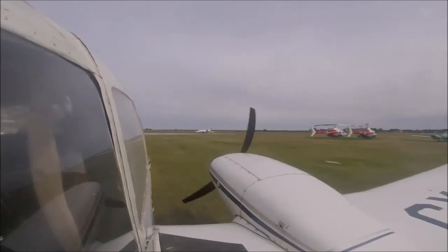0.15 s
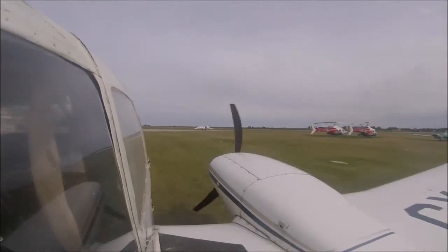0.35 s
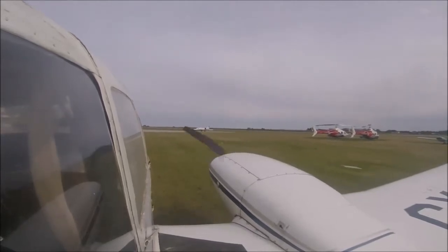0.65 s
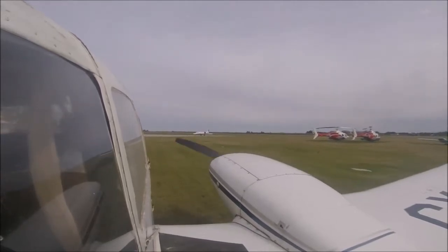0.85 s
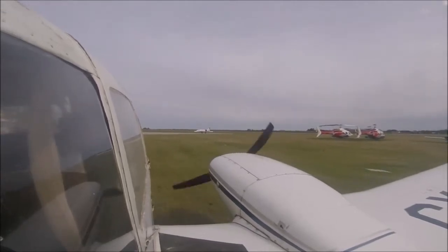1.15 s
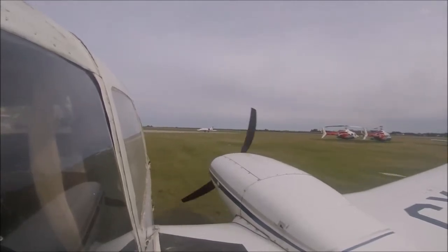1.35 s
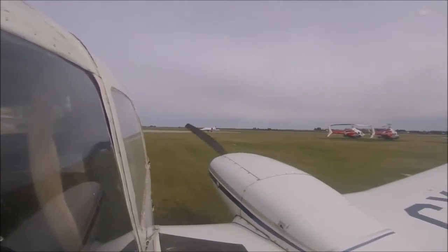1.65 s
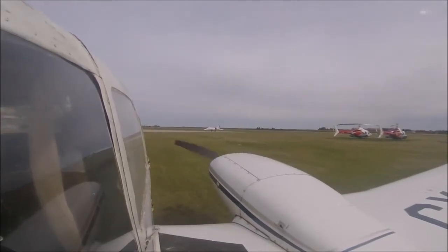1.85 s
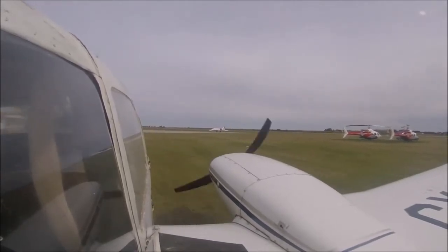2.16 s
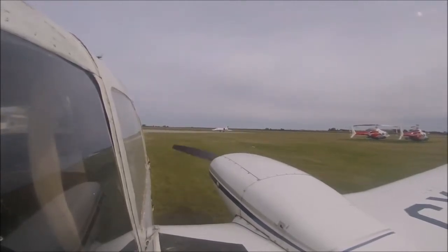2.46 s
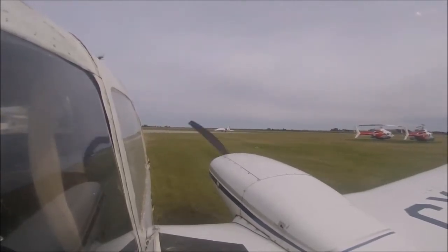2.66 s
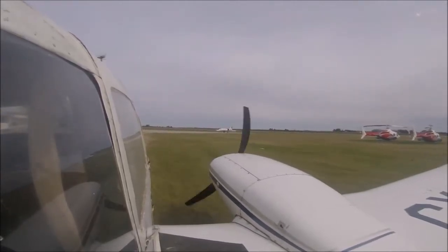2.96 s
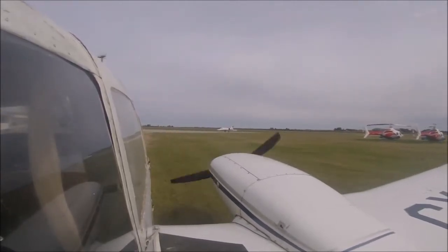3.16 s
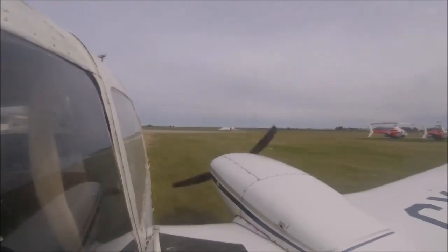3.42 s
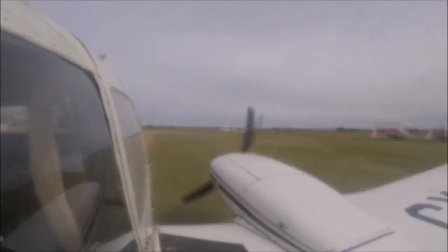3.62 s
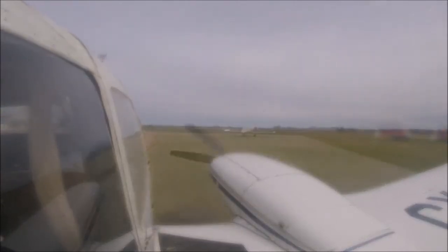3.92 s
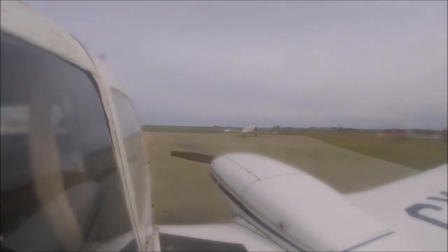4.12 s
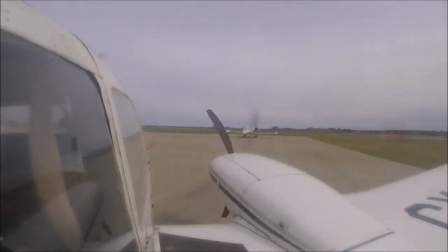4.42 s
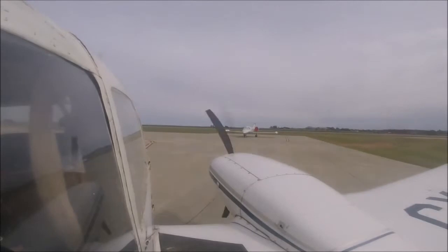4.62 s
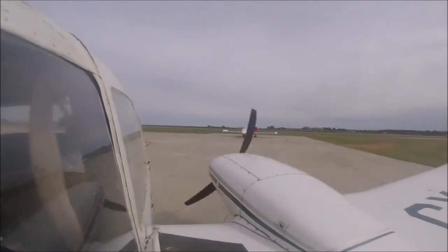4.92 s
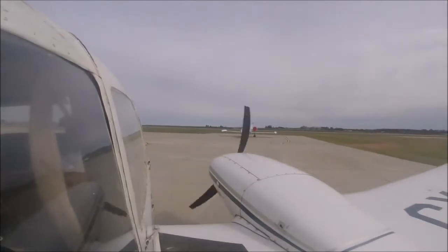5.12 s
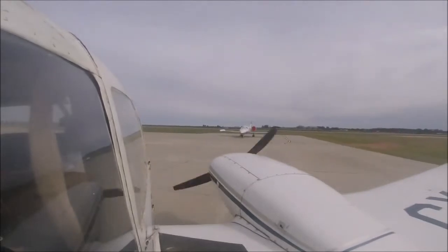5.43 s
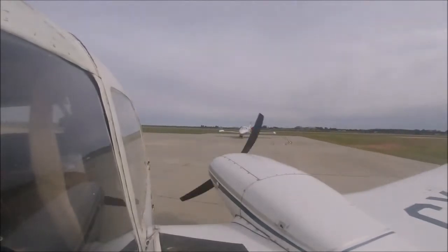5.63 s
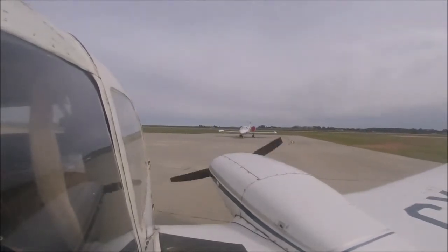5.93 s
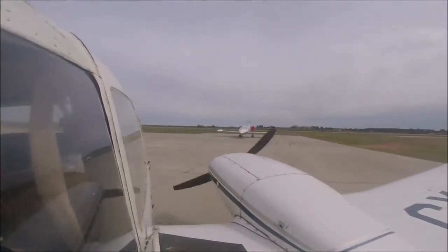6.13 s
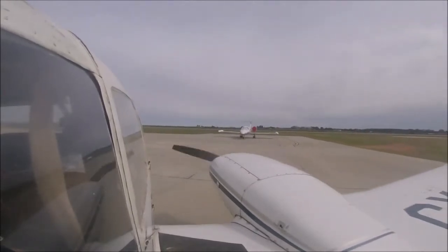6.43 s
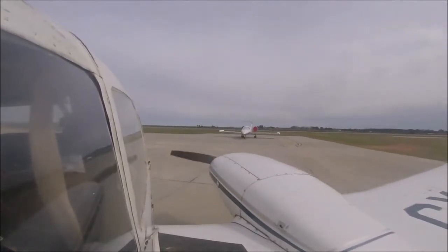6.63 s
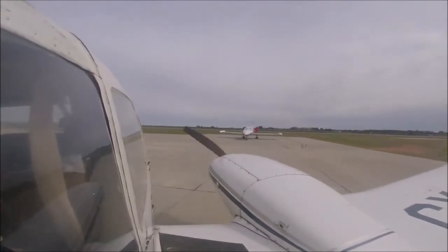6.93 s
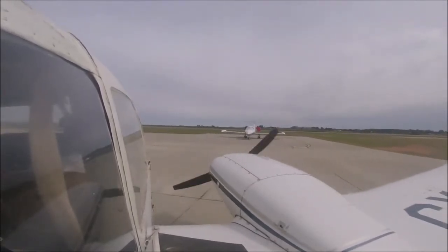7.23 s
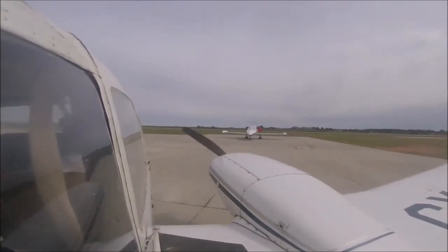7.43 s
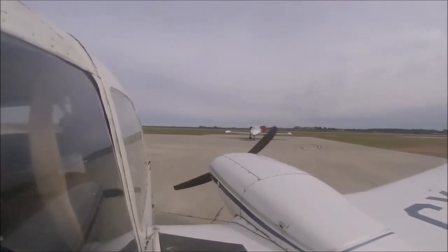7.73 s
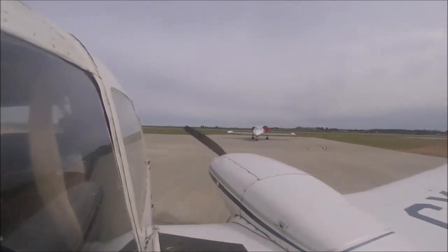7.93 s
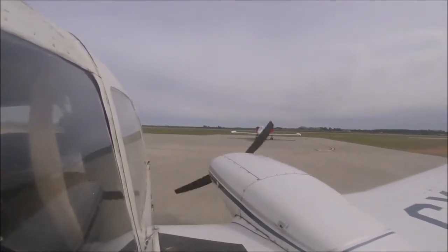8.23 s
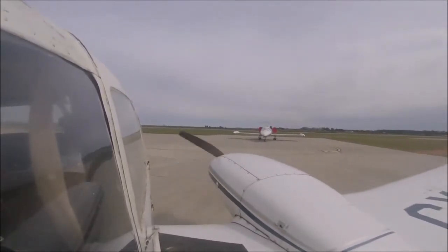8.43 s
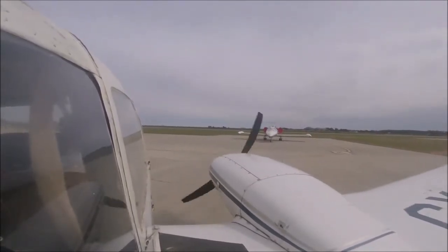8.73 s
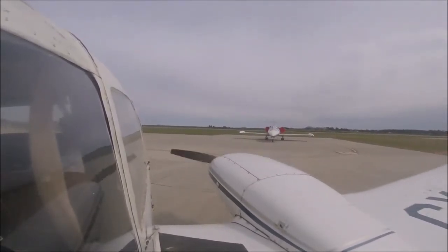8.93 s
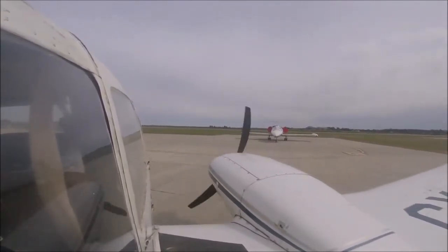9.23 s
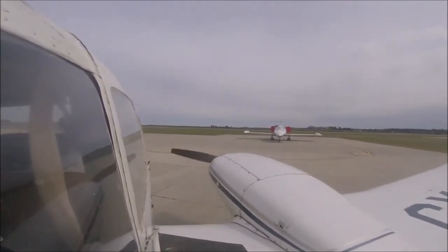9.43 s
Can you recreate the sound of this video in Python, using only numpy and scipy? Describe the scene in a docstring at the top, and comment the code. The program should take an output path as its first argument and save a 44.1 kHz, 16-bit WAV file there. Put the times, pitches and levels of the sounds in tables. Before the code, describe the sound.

A light twin-propeller aircraft taxis, heard from a small housing fixed to the wing. Two engines hum deeply and steadily, beating about once a second, while bumps knock and click the mount. Around four seconds this crossfades into a slower, uneven idle with sharper puttering clatter swelling in spells, a few hard clacks, low wing throb and faint propeller wash.

```python
"""Taxiing light twin

Heard from a microphone housing on the wing, two four-cylinder engines idle at slightly different speeds.
Their tones are harmonic sums that beat; filtered noise, pulsed by the firings, gives boom, clatter and ticks.
A low sine is the wing's sway, coloured noise the propeller wash; short noise blows make the mount knock.
Two stretches overlap for 1.5 s: over grass at about 1000 rpm, then on the apron at about 800 rpm."""
import sys
import numpy as np
from scipy import signal
from scipy.fft import rfft, irfft, next_fast_len
from scipy.io import wavfile
from scipy.ndimage import uniform_filter1d, map_coordinates

SR = 44100
rng = np.random.default_rng(int(sys.argv[2]) if len(sys.argv) > 2 else 0)


def dump(signal):
    """Clip the signal to [-1, 1] and save it as 16-bit WAV at the path in sys.argv[1]."""
    limited = np.clip(np.atleast_2d(signal).T, -1, 1)
    pcm = np.round(limited * 32767).astype(np.int16)
    wavfile.write(sys.argv[1], SR, pcm)


N = 422037

GRASS, APRON = (0, 4.9), (3.39, 9.6)  # start and end of each stretch, s

# Resonances of the microphone housing. Each row: centre [Hz], width [Hz], lift [dB].
HOUSING = [(620, 104, 9.6), (2013, 115, 8.6), (2508, 590, 18.85), (2963, 93, 8.8), (3440, 82, 8.1),
           (3744, 220, 9.3), (4278, 108, 11.6), (4480, 520, 12.4), (5330, 150, 4.4), (6430, 700, 18.6)]
# Rough ground where the grass ends. Each row: peak time [s], build-up [s], lift [dB].
ROUGH_GROUND = [(3.55, 0.28, 5)]
SETTLE_S = 1.8  # time for the shaking to die down


def amp(db):
    """Decibel law: a level in dB becomes an amplitude ratio."""
    return 10 ** (np.asarray(db) / 20)


def unit(x):
    """Power normalisation: scale to rms 1."""
    return x / np.sqrt(np.mean(x ** 2) + 1e-20)


def curve(rows):
    """Linear interpolation: rows of time and value become one value per sample."""
    times, values = np.transpose(rows)
    return np.interp(np.arange(N) / SR, times, values)


def wobble(rate):
    """Band-limited randomness: a smooth curve through random knots, rate of them a second."""
    knots = rng.standard_normal(int(N * rate / SR) + 4)
    return map_coordinates(knots, [np.arange(N) * rate / SR])


def swells(rows, release_s):
    """Piecewise-linear envelope: a lift in dB climbs to each peak and falls back to nothing."""
    t = np.arange(N) / SR
    return sum(np.interp(t, [s - rise, s, s + release_s], [0, db, 0]) for s, rise, db in rows)


def during(span):
    """Gating: 1 within a stretch, 0 outside, joined by 25 ms ramps."""
    t = np.arange(N) / SR
    inside = 1. * ((t >= span[0]) & (t < span[1]))
    return np.abs(uniform_filter1d(inside, size=1100))


def both(grass_db, apron_db):
    """Power addition: gain with one level per stretch, summed in power where they overlap."""
    return np.hypot(during(GRASS) * amp(grass_db), during(APRON) * amp(apron_db))


def body(x, points, modes):
    """Minimum-phase filtering: a unit-energy causal response with a broad colour and resonances on top."""
    size = 2 ** 15
    hz = np.fft.rfftfreq(size, 1 / SR)
    f, level = np.transpose(points)
    db = np.interp(np.log(hz + 1), np.log(f + 1), level)
    db = db + sum(lift / (1 + (2 * (hz - centre) / width) ** 2) for centre, width, lift in modes)
    # folding the cepstrum onto positive time makes the response causal
    cepstrum = irfft(np.log(amp(db)))[:size // 2]
    cepstrum[1:] *= 2
    response = irfft(np.exp(rfft(cepstrum, size)))[:size // 2]
    return signal.oaconvolve(x, response / np.linalg.norm(response))[:N]


def firings(rate_hz, start):
    """Phase accumulation: the running count of firings is the integral of their rate."""
    return start + np.cumsum(rate_hz) / SR


def bursts(count, sharp, scatter_db, lope_db):
    """Amplitude modulation: a swell at every firing, of random strength, heavier on one side of the cycle."""
    strength = scatter_db * rng.standard_normal(1000)[np.round(count).astype(int)]
    lope = lope_db * np.sin(-np.pi * count / 2)
    return amp(strength + lope) * np.exp(sharp * (np.cos(2 * np.pi * count) - 1))


def contact(rise, tail, shiver, shiver_time, strike):
    """Impact: one unit-energy blow, a short rough scrape around a sharp strike, then a shiver (times in s)."""
    t = np.arange(SR // 10) / SR
    swell = np.minimum(t / rise, 1) ** 2
    after = np.maximum(t - rise, 0)
    decay = np.exp(-after / tail) + shiver * np.exp(-after / shiver_time)
    blow = swell * decay * rng.standard_normal(len(t))
    blow = blow / np.linalg.norm(blow)
    blow[np.argmax(t >= rise)] += strike
    return blow / np.linalg.norm(blow)


def on_grass():
    """Beating: at a brisk idle the engines fire about one a second apart, so their harmonics beat."""
    # Firing rate of the far engine. Each row: time [s], rate [Hz].
    far_speed = [(0, 34.21), (0.5, 33.78), (1.5, 34.04), (3, 34.1), (4.9, 34.28)]
    # Engine orders. Each row: multiple of the four-firing cycle rate, mean rms level [dB].
    # Every fourth order is a firing harmonic.
    near_orders = [(2, -44), (3, -42), (4, -39), (7, -52), (8, -37), (9, -47), (10, -48), (11, -41),
                   (12, -32), (16, -50), (18, -46), (19, -42), (20, -35)]
    far_orders = [(4, -41), (8, -38), (11, -48), (12, -35), (16, -54), (18, -52), (20, -34)]
    near = firings(np.full(N, 33), start=.41)  # steady 33 Hz
    far = firings(curve(far_speed), start=.53)
    tone = drone(near, near_orders, waver_db=1.1) + drone(far, far_orders, waver_db=1.1)
    roar = amp(-31.5) * boom(near, far)
    rattle = amp(-50) * clatter(near, sharp=0.41, scatter_db=1.37)
    ticks = amp(-56.5) * valves(near, sharp=0.29)
    return during(GRASS) * (tone + roar + rattle + ticks)


def on_apron(far_hz=27.55, hunt_hz=0.1624, tone_follows=0.31):
    """Uneven combustion: at a slow idle the tone wavers and sharp firings stand out, most in hard spells."""
    # Firing rate of the near engine. Each row: time [s], rate [Hz].
    near_speed = [(3.39, 25.02), (4, 26.71), (4.5, 26.38), (4.8, 27.03), (5.3, 26.03), (6, 26.15),
                  (6.8, 26.48), (7.5, 25.78), (8.3, 26.14), (8.8, 25.38), (9.2, 26.39), (9.57, 25.36)]
    # Engine orders. Each row: multiple of the four-firing cycle rate, level [dB rms] before waver and effort.
    near_orders = [(4, -45), (8, -54), (12, -41), (16, -48.5), (25, -43), (26, -44.5)]
    far_orders = [(6, -48), (12, -44.5), (16, -47), (24, -47)]
    # Spells of harder and harder firing in the near engine. Each row: peak time [s], build-up [s], lift [dB].
    hard_spells = [(4.25, 0.6, 7.5), (5.5, 1, 4.5), (6.45, 0.9, 8.5), (8.05, 0.7, 3.5), (9.1, 0.7, 4)]
    near = firings(curve(near_speed), start=.2)
    far = firings(far_hz + hunt_hz * wobble(2), start=0)
    effort_db = swells(hard_spells, release_s=0.28)
    # the near tone rises tone_follows dB per dB of effort
    near_tone = amp(tone_follows * effort_db) * drone(near, near_orders, waver_db=1.5)
    far_tone = drone(far, far_orders, waver_db=2.5)
    roar = amp(-32.5) * boom(near, far)
    rattle = amp(-56 + effort_db) * clatter(near, sharp=5, scatter_db=1.3)
    far_rattle = amp(-56.5) * clatter(far, sharp=0.17, scatter_db=3.0)
    ticks = amp(-61.5) * valves(near, sharp=0.21)
    return during(APRON) * (near_tone + far_tone + roar + rattle + far_rattle + ticks)


def drone(count, orders, waver_db):
    """Fourier synthesis: exhaust tone from harmonics of the cycle, each wavering with uneven combustion."""
    cycle = 2 * np.pi * count / 4  # four firings make one cycle
    tone = np.zeros(N)
    for order, db in orders:
        level = np.sqrt(2) * amp(db + waver_db * wobble(7))
        tone += level * np.cos(round(order) * cycle)
    return tone


def boom(near, far):
    """Forced resonance: uneven exhaust puffs of both engines ring the airframe."""
    # Broad colour of the boom. Each row: frequency [Hz], relative level [dB].
    colour = [(12, -27.5), (28, 2.5), (45, -2.5), (65, 1), (90, 2.5), (120, -2), (150, -2), (178, -6.5),
              (200, -13), (280, -25.5), (400, -19), (520, -32.5), (1500, -54)]
    # Resonances of the airframe. Each row: centre [Hz], width [Hz], lift [dB].
    airframe = [(84.3, 25, 5.5), (98.06, 4.7, 10), (165.6, 19, 15.5), (182, 9.8, 5), (238, 23, 0.5),
                (305.6, 17, 15.5)]
    puffs = sum(bursts(count, sharp=0.71, scatter_db=1.0, lope_db=0.5) for count in (near, far))
    return unit(body(puffs * rng.standard_normal(N), colour, airframe))


def clatter(count, sharp, scatter_db):
    """Structure-borne excitation: each firing shakes a rattle out of the housing."""
    # Broad colour of the clatter. Each row: frequency [Hz], relative level [dB].
    colour = [(100, -18), (300, 1.5), (500, 0.5), (650, 3), (1000, -1), (1400, -3.5), (1750, -13),
              (2500, -8.5), (3500, -12.5), (5000, -27.5), (6500, -26), (9000, -38), (14000, -55)]
    shakes = bursts(count, sharp, scatter_db, lope_db=-0.65) * rng.standard_normal(N)
    return unit(body(shakes, colour, HOUSING))


def valves(count, sharp):
    """Narrow-band resonance: valve gear ticks with the firings in a high ring."""
    colour = [(2000, -19.0), (5600, -1.5), (6100, 0.5), (6900, -3.5), (7600, -9.5), (10000, -28.0)]
    ticks = bursts(count, sharp, scatter_db=2.3, lope_db=0.5) * rng.standard_normal(N)
    return unit(body(ticks, colour, [(6474, 490, 15.0)]))


def clacks():
    """Impulse response: now and then a single hard firing of the near engine clacks in the housing."""
    # Each row: start [s], strength [dB].
    hard_firings = [(4.191, -13.5), (4.232, -17), (4.83, -17), (6.051, -21), (6.242, -15), (6.354, -13),
                    (6.506, -16.5), (6.542, -20), (7.153, -17.5), (7.847, -13.5)]
    blows = np.zeros(N + SR)
    for s, db in hard_firings:
        blow = contact(rise=0.0022, tail=0.0033, shiver=.1, shiver_time=.006, strike=1.0)
        blows[round(s * SR):][:len(blow)] += amp(db) * blow
    colour = [(200, -7), (900, 9), (1700, -10.0), (2500, 0), (3300, -16), (5000, -16), (7000, -38), (14000, -70)]
    return body(blows[:N], colour, HOUSING)


def wing(sway_hz=19.8, drift=0.203, bumpy_db=3):
    """Single-mode vibration: the wing sways at one low resonance, unevenly on grass, in swells on the apron."""
    swell_period_s, swell_crest_s, swell_db = 0.95, 6.82, 5.5
    t = np.arange(N) / SR
    turns = sway_hz * t + drift * wobble(0.95)
    grass_db = -30.5 + bumpy_db * wobble(3.94) + swells(ROUGH_GROUND, SETTLE_S)
    apron_db = -26 + swell_db * np.cos(2 * np.pi * (t - swell_crest_s) / swell_period_s)
    return np.sqrt(2) * both(grass_db, apron_db) * np.sin(2 * np.pi * turns)


def mount(uneven_db=2.0):
    """Impact excitation: bumps make the mount thud and click; small jolts keep it chattering in between."""
    # Knocks of the mount. Each row: start [s], click strength [dB].
    knocks = [(0.146, -22.5), (0.264, -14.5), (0.563, -30), (0.724, -9), (0.919, -16.5), (0.976, -23),
              (1.083, -18), (1.708, -28), (1.781, -29), (1.882, -20.5), (3.107, -21.5), (3.15, -16),
              (3.512, -7), (3.564, -13.5), (3.597, -20.5), (3.669, -17), (3.951, -12.5), (4.616, -9.5),
              (5.61, -16.5), (6.179, -26), (7.367, -25.5), (7.426, -22.5), (8.928, -33), (8.973, -9.5)]
    # Broad colours of thud and click. Each row: frequency [Hz], relative level [dB].
    thud_colour = [(60, -13.5), (200, -1), (400, 6), (520, -0.5), (800, -8), (1400, -17.5), (1800, -26.5),
                   (3000, -23), (5000, -25.5), (7000, -44), (14000, -71)]
    click_colour = [(300, 6.5), (1000, -2), (1600, -5.5), (2400, 1), (3400, -16.5), (4600, -17),
                    (6000, -26), (9000, -49), (14000, -73)]
    # Resonances of the mount. Each row: centre [Hz], width [Hz], lift [dB].
    modes = [(236.2, 31.6, 12.4), (618.5, 55, 6.2), (689, 140, 6.3), (1012, 57, 5.3), (2437, 300, 16.8),
             (4523, 320, 12.9)]
    # thud under a 0 dB click, and its dB per dB of click: harder knocks are brighter
    thud_db, thud_grows = 1.5, 0.39
    thuds, clicks = np.zeros(N + SR), np.zeros(N + SR)
    for s, db in knocks:
        thud = contact(rise=.003, tail=0.0079, shiver=0.37, shiver_time=0.015, strike=0.61)
        click = contact(rise=0.0028, tail=0.0024, shiver=0.17, shiver_time=0.0092, strike=0.5)
        thuds[round(s * SR):][:len(thud)] += amp(thud_db + thud_grows * db) * thud
        clicks[round(s * SR):][:len(click)] += amp(db) * click
    jolts = unit(amp(3.3 * wobble(70)) * rng.standard_normal(N))
    jostle_db = swells(ROUGH_GROUND, SETTLE_S) + uneven_db * wobble(4.4)
    chatter = both(-48, -51) * amp(jostle_db) * jolts
    return body(thuds[:N] + chatter, thud_colour, modes) + body(clicks[:N], click_colour, modes)


def wash(flutter_db=1.12):
    """Turbulence noise: propeller wash hisses over the housing with a fluttering level."""
    # Broad colour of the wash. Each row: frequency [Hz], relative level [dB].
    colour = [(100, 0), (250, 3), (400, -0.5), (530, -16), (800, -10.5), (1300, -20), (1750, -24),
              (2600, -24.5), (4000, -26.5), (5500, -36), (7300, -25.5), (8700, -25), (10300, -38),
              (12500, -36.5)]
    air = unit(body(rng.standard_normal(N), colour, HOUSING))
    return both(-47, -49) * amp(flutter_db * wobble(15)) * air


def scene():
    """Superposition: both stretches of the taxi, with the wing, the mount and the air."""
    engines = on_grass() + on_apron() + clacks()
    return (engines + wing() + mount() + wash())[None]


def record(dry):
    """Band limiting: a steep low-pass removes nearly everything above 13.9 kHz."""
    size = next_fast_len(N + SR // 2)
    hz = np.fft.rfftfreq(size, 1 / SR)
    lowpass = 1 / (1 + (hz / 13900) ** 80)
    return irfft(rfft(dry, size) * lowpass, size)[:, :N]


dry = scene()
out = record(dry)
dump(out)
```